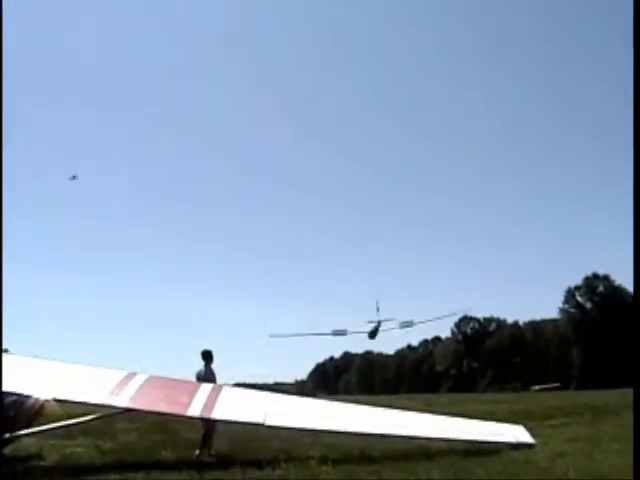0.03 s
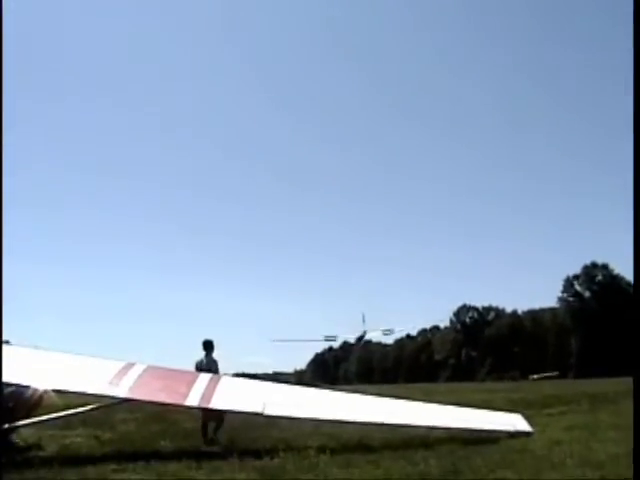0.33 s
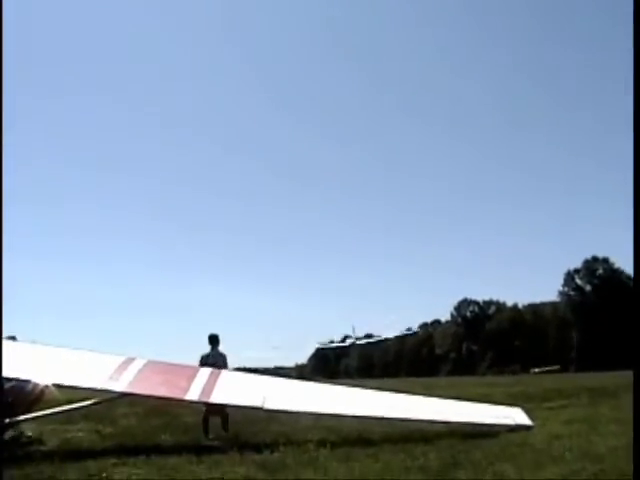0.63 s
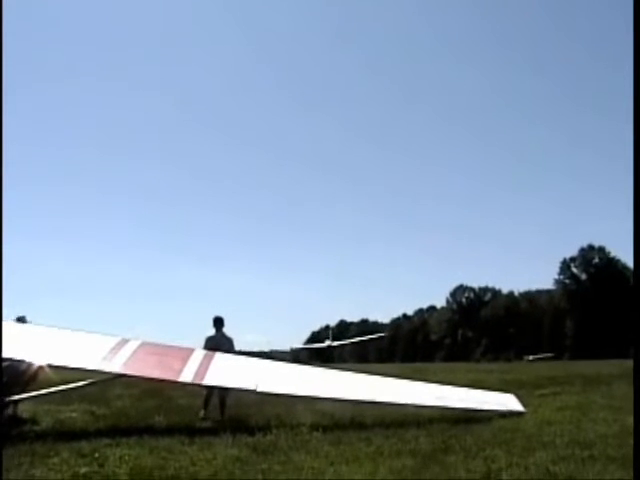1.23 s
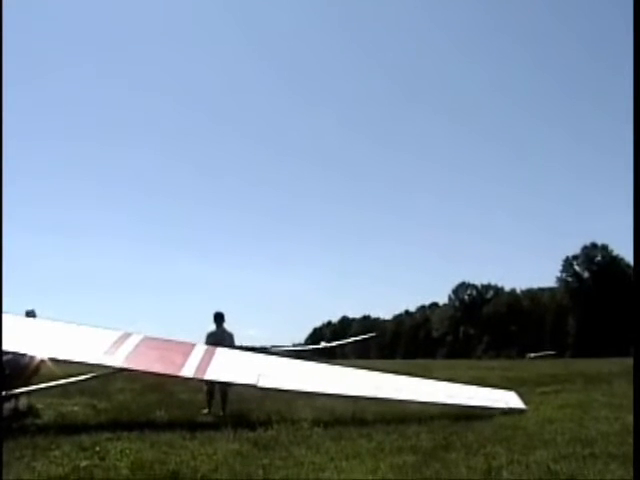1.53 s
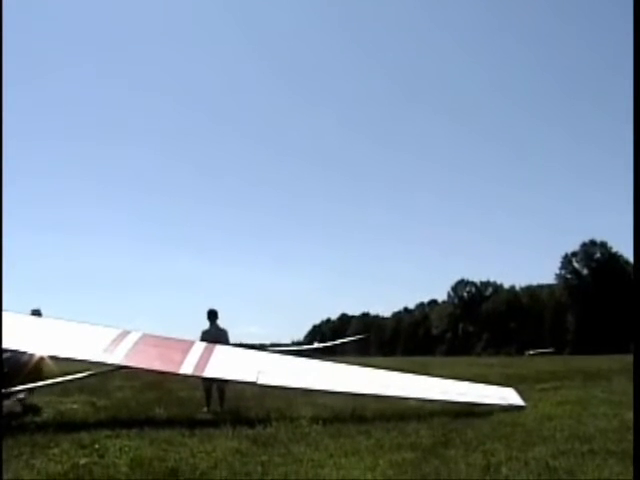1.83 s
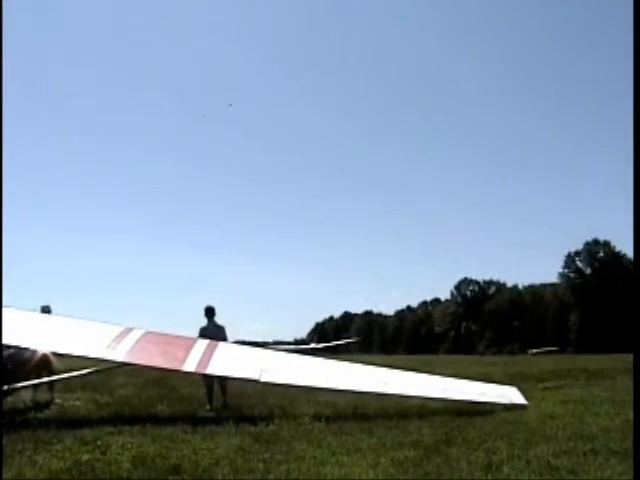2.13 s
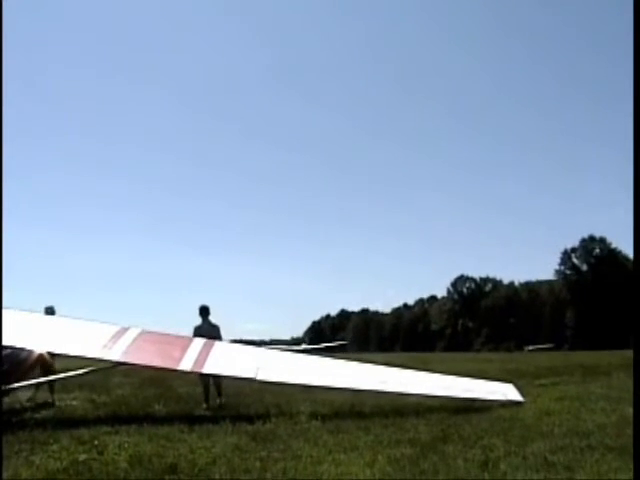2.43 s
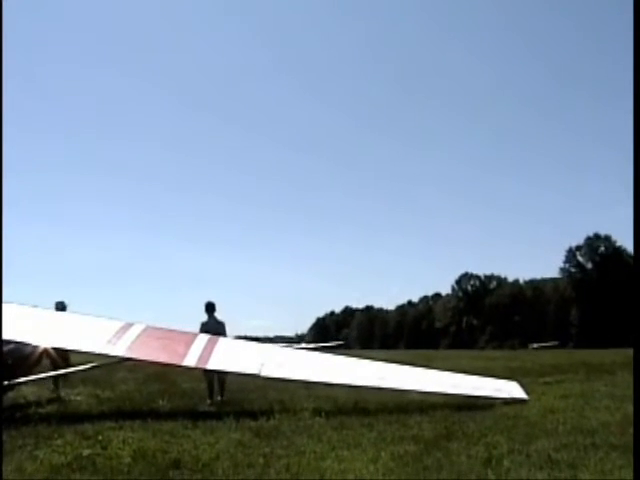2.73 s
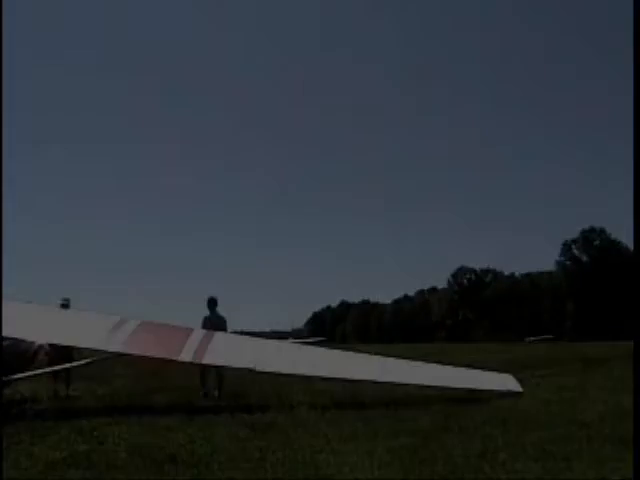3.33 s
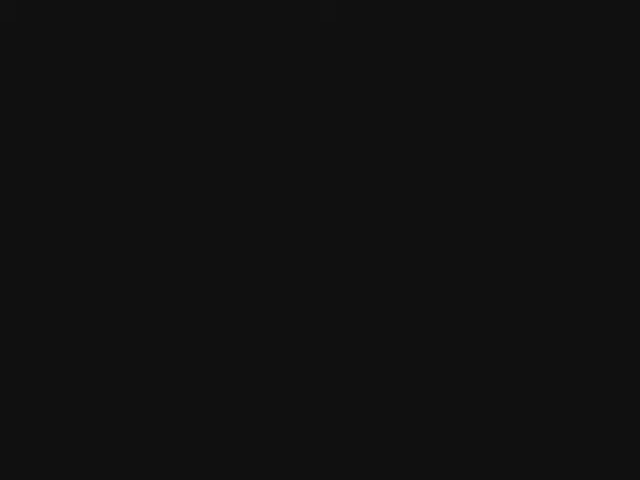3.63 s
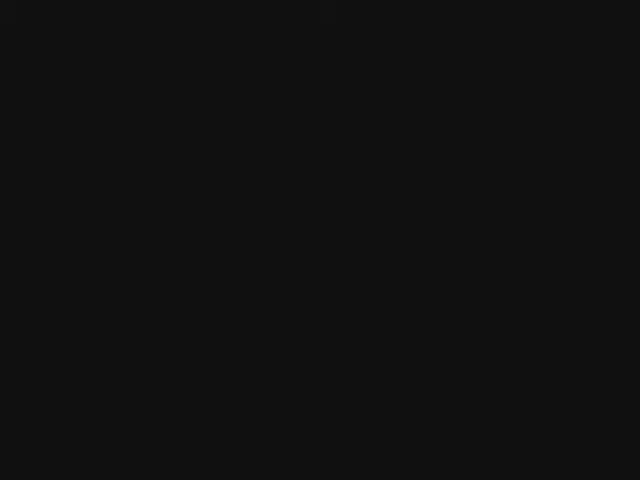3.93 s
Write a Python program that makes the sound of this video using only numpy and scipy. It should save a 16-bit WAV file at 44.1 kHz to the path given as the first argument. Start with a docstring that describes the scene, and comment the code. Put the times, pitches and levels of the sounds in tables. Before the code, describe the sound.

A glider skims low over a grass airfield with a sweeping rush of air, softly brushes the turf and recedes. Two piston engines idle underneath, with low rumble, breeze, crickets and two faint bird chirps, on a stereo camera microphone.

```python
"""At the edge of a grass airfield, on a camera's stereo microphone. A glider skims in low and close, its
air rush combed by the reflection off the ground. Two piston engines idle out of sight, one steady, one
slowing; there is a low rumble, a breeze hisses, crickets and a katydid sing, and the camera's own tape
drum whines faintly. At 0.8 s the wheel brushes the turf and the glider recedes. A bird chirps twice,
and from 1.6 s a nearer cricket trills four times."""
import sys
import numpy as np
from scipy import signal
from scipy.fft import rfft, irfft, next_fast_len
from scipy.io import wavfile
from scipy.ndimage import uniform_filter1d, map_coordinates

SR = 44100
rng = np.random.default_rng(int(sys.argv[2]) if len(sys.argv) > 2 else 0)


def unload_audio(sound):
    """Save the sound as a 16-bit wav file, at the path given as the first command line argument."""
    columns = np.transpose(np.atleast_2d(sound))
    # keep every value between -1 and 1, then stretch to whole-number steps
    steps = np.round(np.clip(columns, -1, 1) * 32767)
    wavfile.write(sys.argv[1], SR, steps.astype(np.int16))


N = 176400

# how alike the open field sounds at the left and right capsules: frequency_hz, correlation
FIELD_CORRELATION = [(150, 0.77), (300, 0.88), (1000, 0.56), (4000, 0.466), (8000, 0.22), (13000, 0.57)]


def amp(db):
    """Decibels to gain."""
    return 10 ** (np.asarray(db) / 20)


def unit(x):
    """x at rms 1."""
    return x / np.sqrt(np.mean(x ** 2) + 1e-20)


def clock():
    """The time of every sample in seconds."""
    return np.arange(N) / SR


def along(points, hz):
    """(frequency_hz, value) points read on a log axis."""
    f, v = np.transpose(points)
    return np.interp(np.log(hz + 1), np.log(f + 1), v)


def curves(rows):
    """One value per sample for each column after the time."""
    time_s, *columns = np.transpose(rows)
    return [np.interp(clock(), time_s, column) for column in columns]


def wobble(rate):
    """A smooth random curve, rate knots a second."""
    return map_coordinates(rng.standard_normal(2 ** 10), [clock() * rate], mode="mirror")


def filtered(x, response):
    """x times a response of frequency."""
    size = next_fast_len(N + SR // 4)
    return irfft(rfft(x, size) * response(np.fft.rfftfreq(size, 1 / SR)), size)[..., :N]


def stereo_noise(spectrum, correlation, patchy_db):
    """Coloured stereo noise of rms 1, with patches of random gain in time and frequency."""
    bins = signal.stft(rng.standard_normal((2, N)), nperseg=512)[2]
    patches = uniform_filter1d(rng.standard_normal(bins.shape[1:]), size=5, axis=0)
    patches = unit(uniform_filter1d(patches, size=14, axis=1))
    pair = signal.istft(bins * amp(patchy_db * patches), nperseg=512)[1][:, :N]

    def mid_side_gains(hz):
        angle = np.arccos(np.clip(along(correlation, hz), -1, 1)) / 2
        return amp(along(spectrum, hz)) * [np.cos(angle), np.sin(angle)]

    mid, side = filtered(pair, mid_side_gains)
    return unit(np.array([mid + side, mid - side]))


def glider():
    """Turbulence at the airbrakes; as the glider sinks, the ground echo lags less and its comb rises."""
    # the rush on the direct path to the microphone: time_s, level_db, treble_gain_db
    flyby = [(0, -33.5, -0.5), (.15, -33, -1.5), (.29, -35.5, 0.5), (.42, -34.5, 0.5), (.56, -37, 3.5),
             (.71, -36.5, 2), (.78, -36.5, 1), (.9, -34.5, -5.5), (1.1, -37, -4.5), (1.4, -38, -2.5),
             (1.8, -43, -3), (2.4, -55, -2.5), (3.7, -72.5, -3.5)]
    # lag of the ground reflection: time_s, lag_ms
    ground_lag = [(0, .66), (.12, .62), (.28, .49), (.42, .39), (.55, .32), (.66, .262), (.73, .225),
                  (.8, .17), (1, .135), (3.7, .09)]
    # colour of the rush: frequency_hz, density_db
    rush_spectrum = [(150, -9.5), (400, -12), (600, -6.5), (780, -2), (1350, -6), (1650, -14.5),
                     (2400, -13), (3000, -17), (3800, -17.5), (5200, -17), (6500, -21.5), (8800, -25),
                     (12000, -38.5), (16000, -45.5)]
    # its left-right likeness: frequency_hz, correlation
    rush_correlation = [(300, 0.9), (1500, 1), (8000, 0.91)]
    treble_hz, ground_share, lag_smear = 3200, .52, .125
    level_db, treble_db = curves(flyby)
    lag_ms, = curves(ground_lag)
    rush = stereo_noise(rush_spectrum, rush_correlation, patchy_db=1.5)
    treble = filtered(rush, lambda hz: 1 - 1 / (1 + (hz / treble_hz) ** 6))
    direct = rush + (amp(treble_db) - 1) * treble
    paths = np.linspace(-2, 2, 9)  # the grass smears the reflection over a spread of lags
    shares = np.exp(-paths ** 2 / 2)
    reflected = np.zeros((2, N))
    for path, share in zip(paths, shares / shares.sum()):
        earlier = np.arange(N) - lag_ms * (1 + lag_smear * path) * SR / 1000
        reflected += share * np.array([np.interp(earlier, np.arange(N), side) for side in direct])
    return amp(level_db) * (direct - ground_share * reflected)  # a grazing reflection is inverted


def slowing_engine():
    """Each firing's puff rings the exhaust pipe; the uneven puffs throb about twelve times a second."""
    # falling shaft speed: time_s, speed_rpm
    speed = [(0, 1590.7), (.3, 1568.3), (.6, 1555.9), (1.2, 1515.6), (2, 1454.8), (2.8, 1394.9),
             (3.7, 1323.7)]
    # the loping beat within one four-stroke cycle: place_in_cycles, level_db
    firings = [(.12, -15), (.276, -15), (.43, -8), (.561, 0), (.82, -4.5), (.963, 0)]
    # resonances of the exhaust pipe: centre_hz, width_hz
    pipe_modes = [(72, 56), (140, 52)]
    # colour of the muffler: frequency_hz, gain_db
    muffler = [(25, -31.5), (45, -0.5), (62, 0), (72, -5), (90, 0.5), (115, 2), (135, -1), (165, 2.5),
               (186, 2), (210, -1.5), (240, -9.5), (280, -0.5), (400, -12.5), (800, -24)]
    level_db, scatter_db = -26.3, 1.2
    rpm, = curves(speed)
    cycles = np.cumsum(rpm / 120) / SR  # two shaft turns to a cycle
    puffs = np.zeros(N)
    for place, db in firings:
        at = np.searchsorted(cycles, np.arange(place, cycles[-1]))
        puffs[at] += amp(db + scatter_db * rng.standard_normal(len(at)))

    def exhaust(hz):
        modes = [1j * hz * width / (centre ** 2 - hz ** 2 + 1j * hz * width)
                 for centre, width in pipe_modes]
        return np.prod(modes, axis=0) * amp(along(muffler, hz))

    return -amp(level_db) * unit(filtered(puffs, exhaust))


def steady_engine():
    """A smoother exhaust farther off: low, wavering partials locked to the cycle of two shaft turns."""
    # idling shaft speed: time_s, speed_rpm
    speed = [(0, 1308), (0.7, 1289), (1.4, 1304), (2.4, 1317), (3.7, 1306)]
    # exhaust partials: multiple_of_cycle_rate, level_db
    partials = [(6, -34.5), (9, -43), (12, -37.5), (14, -48), (15, -43), (16, -40.5), (18, -47.5),
                (20, -45.5), (24, -55.5)]
    waver_db, waver_rad = 1.3, .08
    rpm, = curves(speed)
    cycles = np.cumsum(rpm / 120) / SR
    out = np.zeros(N)
    for order, db in partials:
        phase = 2 * np.pi * (order * cycles + rng.random()) + waver_rad * wobble(4)
        out += amp(db + waver_db * wobble(3.5)) * np.sin(phase)
    return np.sqrt(2) * out


def low_rumble():
    """A steady low rumble, with a deep noise that swells near the start and again near the end."""
    # colour of the rumble: frequency_hz, density_db
    rumble_spectrum = [(20, -39.5), (40, -8.5), (70, -1), (100, -3), (175, -2.5), (250, -2), (300, -10),
                       (345, -8), (410, -17.5), (800, -44.5)]
    # colour of the deep noise: frequency_hz, density_db
    deep_spectrum = [(60, -23), (95, -7), (130, -5), (150, -5.5), (182, 1.5), (200, -4.5), (230, -27),
                     (400, -59)]
    # loudness of the deep noise: time_s, level_db
    deep_levels = [(0, -30), (.24, -24.5), (.38, -37), (.52, -27), (.65, -34.5), (1, -34.5), (1.4, -38.5),
                   (2.6, -43.5), (3.1, -33), (3.65, -31)]
    rumble = amp(-34.5) * stereo_noise(rumble_spectrum, FIELD_CORRELATION, patchy_db=2.0)
    deep_db, = curves(deep_levels)
    deep_noise = amp(deep_db) * stereo_noise(deep_spectrum, correlation=[(150, 1.0)], patchy_db=1.5)
    return rumble + deep_noise


def breeze():
    """A light, even hiss from the grass and trees around the microphone."""
    # colour of the hiss: frequency_hz, density_db
    spectrum = [(200, -10), (500, -2.5), (590, -4.5), (720, -0.5), (1380, -2), (1650, -9.5), (2200, -9.5),
                (3400, -16), (5000, -20), (6500, -19.5), (8700, -23), (10500, -25.5), (15500, -27.5)]
    level_db = -37.5 + .3 * wobble(7.8)
    return amp(level_db) * stereo_noise(spectrum, FIELD_CORRELATION, patchy_db=0.78)


def cricket_chorus():
    """Many ground crickets out in the meadow merge into a shimmering band, slightly to the right."""
    # band of the chorus: frequency_hz, density_db
    spectrum = [(6200, -38), (6750, -23), (6980, -1), (7750, 0), (8100, -8.5), (8900, -10.5), (9600, -41.5)]
    level_db, pan_db = -50.5 + .78 * wobble(90), .5
    chorus = amp(level_db) * stereo_noise(spectrum, correlation=[(7500, .45)], patchy_db=0.8)
    return chorus * amp([[-pan_db], [pan_db]])


def katydid():
    """One katydid ticks evenly, pitched far above the crickets."""
    pitch_hz, ticks_per_s, half_tick_s = 13300, 40.7, .0003
    strokes = ticks_per_s * clock() + .05 * wobble(4.7)
    from_tick_s = (strokes % 1 - .5) / ticks_per_s
    phase = 2 * np.pi * np.cumsum(pitch_hz + 600 * wobble(200)) / SR
    ticks = amp(-47.7 + 2 * wobble(20)) * np.exp(-(from_tick_s / half_tick_s) ** 2)
    return np.sqrt(2) * ticks * np.sin(phase)


def camera_whine():
    """The tape drum's whine and the line scan's whistle reach the microphone through the case."""
    # partials of the drum: multiple_of_drum_tone, level_db
    partials = [(18, -70), (19, -64), (27, -70), (31, -70), (32, -66), (33, -63), (34, -65), (35, -71),
                (36, -74), (37, -72), (39, -73), (47, -73), (48, -74), (51, -74)]
    drum_hz, scan_hz, scan_db = 299.7, 15734, -66
    tones = [(order * drum_hz, db) for order, db in partials] + [(scan_hz, scan_db)]
    whine = sum(amp(db) * np.sin(2 * np.pi * (hz * clock() + rng.random())) for hz, db in tones)
    return np.sqrt(2) * whine


def touchdown():
    """A soft, distant scuff as the wheel brushes the grass."""
    # dull colour of wheel on turf: frequency_hz, density_db
    spectrum = [(150, -23), (240, -13), (350, 0), (480, -4.5), (700, -5.5), (1500, -19.5), (4000, -48.5)]
    peak_s, half_length_s, peak_db = .81, .06, -38
    swell = np.exp(-((clock() - peak_s) / half_length_s) ** 2)
    return amp(peak_db) * swell * stereo_noise(spectrum, FIELD_CORRELATION, patchy_db=1.0)


def bird():
    """Two short, faint whistles, each a slightly ragged glide under a smooth swell."""
    # the whistles: start_s, length_s, start_hz, end_hz, level_db
    chirps = [(1.305, .05, 2310, 2295, -38.3), (1.462, .07, 2370, 2110, -37.2)]
    waver_hz = 18
    out = np.zeros(N)
    for start_s, length_s, start_hz, end_hz, db in chirps:
        progress = np.clip((clock() - start_s) / length_s, 0, 1)
        hz = start_hz + (end_hz - start_hz) * progress + waver_hz * wobble(200)
        out += amp(db) * np.sin(np.pi * progress) * np.sin(2 * np.pi * np.cumsum(hz) / SR)
    return out


def near_cricket():
    """One cricket nearer the microphone gives brief trills, raspy with a fast jitter of pitch."""
    # the trills: peak_s, pitch_hz, level_db
    trills = [(1.61, 8250, -56), (2.18, 8250, -54), (2.8, 8900, -57), (3.46, 8950, -55.5)]
    half_length_s, jitter_hz = .04, 160
    out = np.zeros(N)
    for peak_s, hz, db in trills:
        phase = 2 * np.pi * np.cumsum(hz + jitter_hz * wobble(270)) / SR
        swell = np.exp(-((clock() - peak_s) / half_length_s) ** 2)
        out += amp(db) * swell * np.sin(phase)
    return out


def scene():
    """Everything that reaches the microphone at the edge of the strip."""
    landing = glider() + touchdown()
    engines = slowing_engine() + steady_engine()
    field = low_rumble() + breeze() + cricket_chorus() + katydid() + near_cricket() + bird()
    return landing + engines + field + camera_whine()


def record(dry):
    """The camera leans slightly right, stops just before the end and keeps nothing above its band."""
    balance_db, stop_s, fade_s, top_hz = .22, 3.734, .008, 15900
    running = np.clip((stop_s - clock()) / fade_s, 0, 1)
    return filtered(dry * running * amp([[-balance_db], [balance_db]]), lambda hz: hz < top_hz)


dry = scene()
out = record(dry)
unload_audio(out)
```